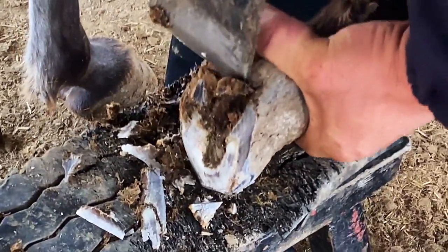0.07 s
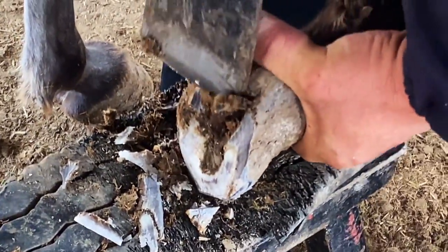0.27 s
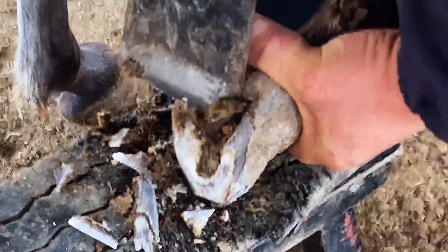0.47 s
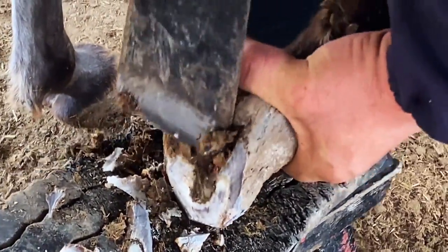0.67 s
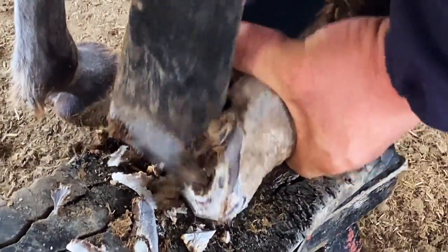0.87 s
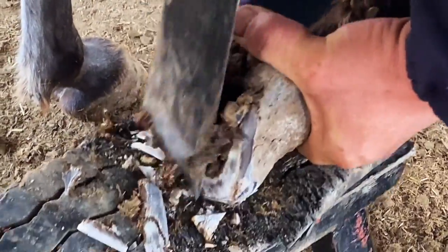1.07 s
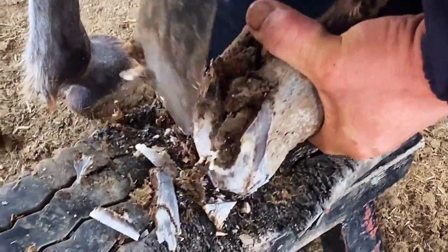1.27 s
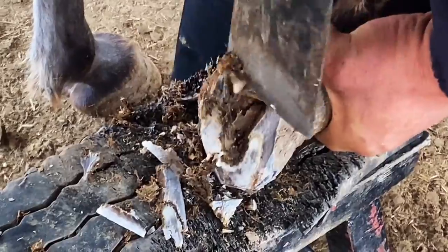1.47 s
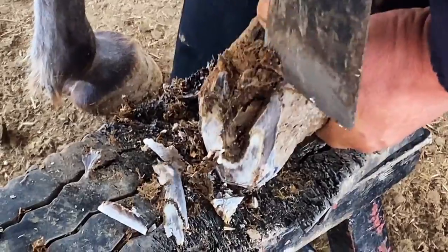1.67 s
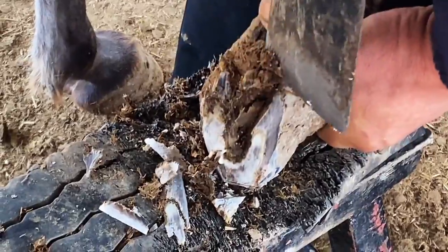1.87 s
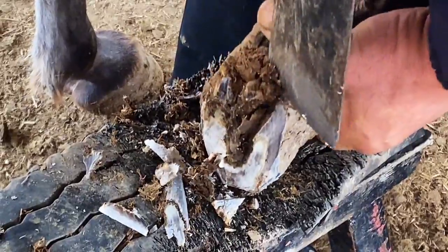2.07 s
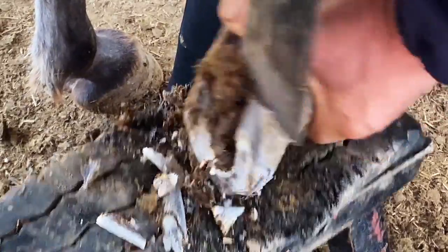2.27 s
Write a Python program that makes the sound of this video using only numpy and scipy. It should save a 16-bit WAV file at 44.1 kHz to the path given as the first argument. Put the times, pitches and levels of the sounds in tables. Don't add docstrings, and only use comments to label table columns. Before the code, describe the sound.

Close stereo pickup in an open yard: a low thump, thin grainy paring strokes, a cluster of sharp ticks midway and more near the end, all faint above wavering engine drone and smooth high insect noise.

```python
import sys
import numpy as np
from scipy import signal
from scipy.fft import rfft, irfft
from scipy.io import wavfile
from scipy.ndimage import uniform_filter1d

SR = 44100
rng = np.random.default_rng(int(sys.argv[2]) if len(sys.argv) > 2 else 0)


def boost(x):
    u = np.asarray(x, float) / 20
    return 10 ** u


def inscribe(sig):
    pcm = np.round(np.clip(np.atleast_2d(sig).T, -1, 1) * 32767)
    wavfile.write(sys.argv[1], SR, pcm.astype(np.int16))


N = 101429


def colour(x, table, lifts=()):
    n = x.shape[-1]
    f_hz = np.maximum(np.fft.rfftfreq(n, 1 / SR), 1)
    points = np.array(table, float)
    db = np.interp(np.log(f_hz), np.log(points[:, 0]), points[:, 1])
    db = db - 30 * np.log2(np.maximum(points[0, 0] / f_hz, 1))
    for hz, width_hz, lift_db in lifts:
        db = db + lift_db * np.exp(-.5 * ((f_hz - hz) / width_hz) ** 2)
    return irfft(rfft(x) * boost(db), n)


def set_rms(x, db):
    return x * boost(db) / np.sqrt(np.mean(x ** 2))


def walk(rate_hz):
    hold = int(SR / rate_hz)
    steps = np.repeat(rng.standard_normal(N // hold + 1), hold)
    drift = uniform_filter1d(uniform_filter1d(steps, hold), hold)[:N]
    return drift / np.std(drift)


def ports(x, first=0):
    # f/Hz, phase/rad
    lead = [(0, 0), (260, .3), (1100, 3.14), (2100, 0), (6950, 0), (16500, -14.39)]
    f_hz, points = np.fft.rfftfreq(N, 1 / SR), np.array(lead[first:])
    turn = np.exp(.5j * np.interp(f_hz, points[:, 0], points[:, 1]))
    return irfft(rfft(x) * np.array([turn, turn.conj()]), N)


def rumble():
    # f/Hz, level/dB per Hz
    spectrum = [(30, -48.5), (52, -44.5), (110, -49.5), (300, -58.5), (550, -70), (1200, -76.5),
                (2200, -88), (4000, -93.5)]
    # f/Hz, width/Hz, lift/dB
    resonances = [(491, 79, 5), (345, 17, 4), (420, 8.3, -10)]
    # f/Hz, level/dB
    diffuse = [(60, -15.5), (200, -11), (500, 0), (1100, -1.5), (2500, 2.5)]
    swell_db, flicker_db = -2.3, 1
    noise = colour(rng.standard_normal((3, N)), spectrum, resonances)
    pair = ports(noise[0]) + colour(noise[1:], diffuse)
    spec, swell, out = rfft(pair), walk(0.84), 0
    octave = np.clip(np.log2(np.fft.rfftfreq(N, 1 / SR) / 40 + 1e-9), 0, 8)
    for k in range(9):
        band = irfft(spec * np.maximum(1 - np.abs(octave - k), 0), N)
        out = out + band * boost(swell_db * swell / (1 + k) + flicker_db * walk(14))
    return set_rms(out, -40)


def engine():
    # multiple of firing rate, level/dB rms
    orders = [(2, -54), (4, -51.5), (6, -59), (7, -66.5), (10, -61)]
    # t/s, level/dB
    load = [(0, -8), (.3, 2), (.5, 1), (.68, 0), (.85, -0.5), (1.0, 4), (1.45, 1.5), (1.65, -7),
            (1.9, -3.5), (2.17, 5), (2.3, -4)]
    # t/s, f/Hz, level/dB rms
    exhaust = [(0.0, 47.6, -45), (0.05, 49, -54), (0.16, 56.07, -48.5), (0.39, 54.93, -43.5),
               (0.48, 59.9, -63), (0.49, 59.2, -43), (0.682, 58.17, -44), (1.128, 60.7, -45),
               (1.244, 53.7, -41), (1.386, 49.14, -53), (1.476, 55.9, -42), (1.568, 58.6, -37),
               (1.664, 59, -64), (1.78, 58.1, -38.5), (1.876, 56.5, -50), (1.912, 57.7, -41),
               (2.252, 60.35, -48), (2.3, 62.5, -57.5)]
    firing_hz, firing_drift = 48.17, 0.01407
    t = np.arange(N) / SR
    load_db = np.interp(t, *np.array(load).T)
    thrum_t, thrum_hz, thrum_db = np.array(exhaust).T
    thrum_amp = uniform_filter1d(boost(np.interp(t, thrum_t, thrum_db) + 3.5), size=SR // 25)
    tones = thrum_amp * np.sin(2 * np.pi * np.cumsum(np.interp(t, thrum_t, thrum_hz)) / SR)
    phase = 2 * np.pi * np.cumsum(firing_hz * (1 + firing_drift * walk(5))) / SR
    for m, db in orders:
        order_amp = boost(db + 1.5 + load_db + 1.5 * walk(8.43))
        tones = tones + order_amp * np.sin(m * phase + m * m)
    return ports(tones)


def insects():
    # f/Hz, level/dB per Hz
    spectrum = [(1800, -84), (3000, -84.5), (4500, -75), (6300, -71), (8000, -76.5), (11500, -85.5),
                (14500, -101), (16000, -104)]
    # f/Hz, width/Hz, lift/dB
    chorus = [(3577, 256, 7.5), (4640, 280, 5), (5740, 120, 3.5), (1400, 66, 17)]
    hiss = colour(rng.standard_normal(N), spectrum, chorus)
    flicker_db = .3 * walk(16.64)
    return set_rms(ports(hiss) * boost(flicker_db), -49)


def taps():
    # t/s, peak/dB, body f/Hz, crack/dB re body, L-R/dB
    contacts = [(.4085, -49, 1760, -35, -22), (0.4083, -54, 1290, -35, -8), (.411, -30, 532, -30, 0),
                (.509, -51.5, 1440, -10, -9), (.512, -43.5, 745, -12, -2), (.803, -56, 930, -4, 0),
                (.845, -35, 685, -25, 4), (0.852, -41.5, 1100, -13, 10), (0.849, -42, 1670, -20, 4),
                (.8515, -40, 2420, -8, 5), (0.8513, -39, 2890, 0, 10), (0.851, -35, 3550, -20, 9),
                (0.85, -36, 5900, -23, 0), (.852, -38, 7650, -16, 4), (.852, -42, 9500, -4, 13),
                (.852, -41, 12500, 1, -2), (0.851, -37, 15000, -20, 2), (0.862, -43.5, 974, -25, 4),
                (.8845, -37, 6200, -15, 0), (0.94, -51, 1400, -3, 0), (.964, -46, 2820, -1, 24),
                (1.0242, -32.5, 755, -37, -6), (1.0242, -44, 1020, -35, -3.5), (1.263, -47.5, 883, -12, 0),
                (1.505, -45, 1430, 5, 8), (1.585, -47.5, 1400, 8.5, 10), (1.8285, -44, 870, -12, 0),
                (1.83, -51, 1490, 2, 13), (2.125, -37.5, 1475, 3, 10), (2.124, -46, 2180, -10, 4),
                (2.1263, -33, 3890, -22, 3), (2.127, -35, 4530, -20, 17), (2.126, -39, 6500, -22, 11),
                (2.126, -40.5, 10900, 9, -5), (2.126, -40.5, 940, -10, 5), (2.177, -40.5, 1690, -2, 3),
                (2.178, -39.5, 3060, -5, 14), (2.18, -43, 1490, -9, 10), (2.246, -49, 1010, 5, 3),
                (2.283, -36, 4350, -6, -1)]
    # f/Hz, level/dB
    crack_spectrum = [(400, -22), (900, 0), (2000, -2.5), (4000, 0), (7000, 1), (12000, -6), (15500, -24),
                      (16500, -32)]
    mode_ratios, mode_db, damping_cycles = (1, 1.334, 0.678), (0, -16, -16), 16
    contact_s, crack_rise_s, crack_hold_s, crack_tail_s = 0.0014, 0.00035, .0028, .004
    length = 2048
    out, t = np.zeros((2, N + length)), np.arange(length) / SR
    crack_env = np.minimum(t / crack_rise_s, 1)
    crack_env = crack_env * np.exp(-np.maximum(t - crack_hold_s, 0) / crack_tail_s * 2)
    for start_s, db, hz, crack_db, pan_db in contacts:
        crack = colour(rng.standard_normal(length) * crack_env, crack_spectrum)
        ring = 0
        for ratio, gain_db in zip(mode_ratios, mode_db):
            mode_hz = hz * ratio
            decay = np.exp(-np.log(1000) * t * np.sqrt(mode_hz * 1000) / damping_cycles)
            ring = ring + boost(gain_db) * np.sin(2 * np.pi * mode_hz * t) * decay
        rise = np.minimum(t / contact_s * np.sqrt(hz / 1000), 1)
        ring = ring * np.sin(np.pi / 2 * rise) ** 2
        tap = ring / np.abs(ring).max() + boost(crack_db) * crack / np.abs(crack).max()
        i = int(start_s * SR)
        out[:, i:i + length] += boost(db) * tap * boost(np.array([[pan_db], [-pan_db]]) / 2)
    return ports(out[:, :N], first=3)


def thud():
    # f/Hz, level/dB
    edge = [(20, 0), (1900, 0), (3200, -18)]
    start_s, level_db = .4095, -13.8
    turns, floor_hz, sweep_start_s, phase_rad = 1.192, 41.75, .00067, 4.28
    lag_s, lag_rise_s = .003, .009
    peak_s, fade_s, rise_power = .019, .0165, .46
    dip_s, dip_width_s, dip_depth = .0075, .003, .5
    t = np.maximum(np.arange(N) / SR - start_s, 0)
    t = np.array([t, t - lag_s * (1 - np.exp(-t / lag_rise_s)) ** 1.34])
    hz = np.hypot(turns / (t + sweep_start_s), floor_hz)
    phase = 2 * np.pi * np.cumsum(hz * np.gradient(t, axis=1), axis=1) + phase_rad
    env = (t / peak_s) ** rise_power * np.exp(-(np.maximum(t - peak_s, 0) / fade_s) ** 2)
    env = env * (1 - dip_depth * np.exp(-((t - dip_s) / dip_width_s) ** 2))
    return colour(boost(level_db) * env * np.cos(phase), edge)


def scrapes():
    # start t/s, peak t/s, end t/s, level/dB
    pushes = [
        (0.53, 0.58, 0.71, -50.5),
        (0.77, 0.803, 0.88, -52),
        (0.938, 0.971, 1, -48.5),
        (1.016, 1.061, 1.03, -55),
        (1.3, 1.36, 1.4, -64),
        (2.114, 2.126, 3.3, -57),
        (2.21, 2.3, 2.3, -48.5),
    ]
    # f/Hz, level/dB
    slip_spectrum = [(1500, -11), (3000, -6), (6000, -2), (10000, -6), (13000, -5.5), (15500, -9),
                     (17000, -30)]
    grains_per_s, grain_spread_db, wobble_db = 3800, 3.5, 2
    t = np.arange(N) / SR
    chance, size, sign = rng.random((3, N))
    grain_amp = boost(-grain_spread_db * np.log(size + 1e-4))
    slips = (chance < grains_per_s / SR) * grain_amp * np.sign(sign - .5)
    push = sum(boost(db) * np.interp(t, [a, m, b], [0, 1, 0]) for a, m, b, db in pushes)
    return ports(set_rms(colour(slips, slip_spectrum), 0) * push * boost(wobble_db * walk(70)))


def scene():
    return rumble() + engine() + insects() + taps() + thud() + scrapes()


def roll_off(x):
    return signal.sosfilt(signal.butter(12, 16650, fs=SR, output="sos"), x)


def record(dry):
    # low f/Hz, high f/Hz, level/dB
    mono_bands = [(2150, 3600, -9), (3600, 7400, -30)]
    # f/Hz, width/Hz, level/dB
    mid_gaps = [(9040, 320, -12), (13250, 480, -14), (15750, 380, -20)]
    # f/Hz, width/Hz, level/dB
    side_gaps = [(11200, 450, -12), (15300, 600, -14)]
    top_hz, low_cut_hz = 15850, 31
    f_hz = np.fft.rfftfreq(N, 1 / SR)
    ends = (f_hz < top_hz) * f_hz ** 4 / (f_hz ** 4 + low_cut_hz ** 4)

    def notches(gaps):
        return boost(sum(db * np.exp(-.5 * ((f_hz - hz) / width_hz) ** 2) for hz, width_hz, db in gaps))

    fold = boost(sum(db * (f_hz > lo) * (f_hz <= hi) for lo, hi, db in mono_bands))
    mid = irfft(rfft(dry[0] + dry[1]) * notches(mid_gaps) * ends, N) / 2
    side = irfft(rfft(dry[0] - dry[1]) * notches(side_gaps) * fold * ends, N) / 2
    return roll_off(np.array([mid + side, mid - side]))


dry = scene()
out = record(dry)
inscribe(out)
```